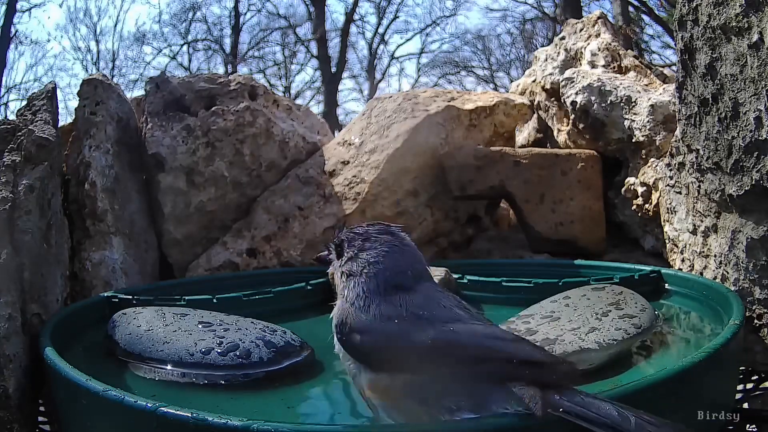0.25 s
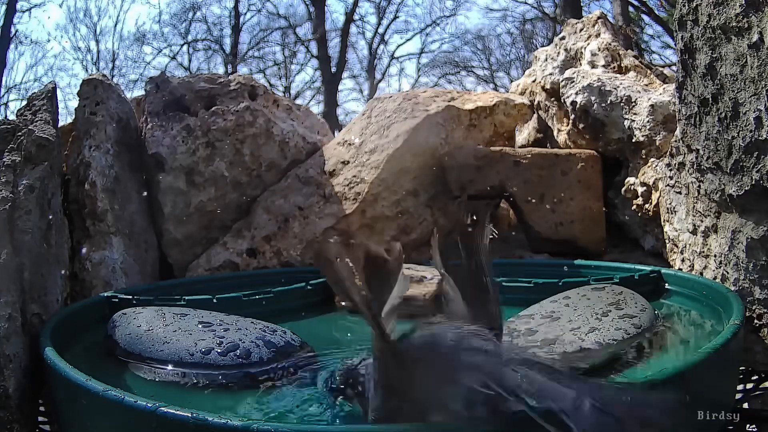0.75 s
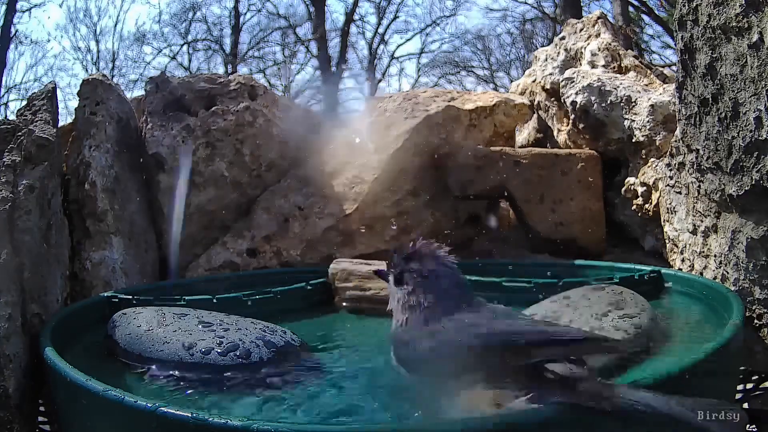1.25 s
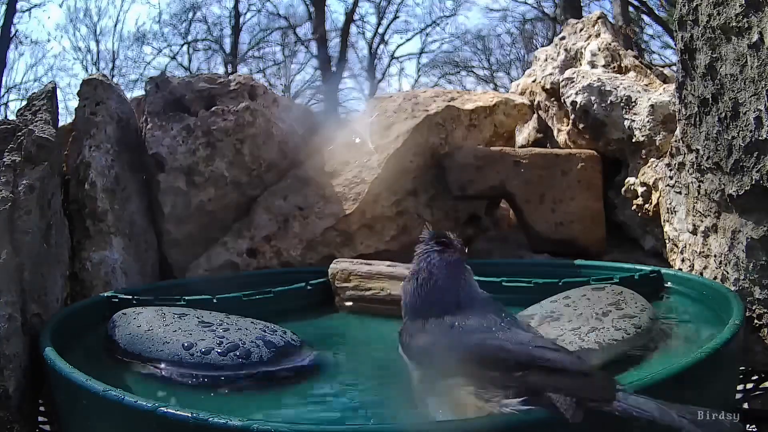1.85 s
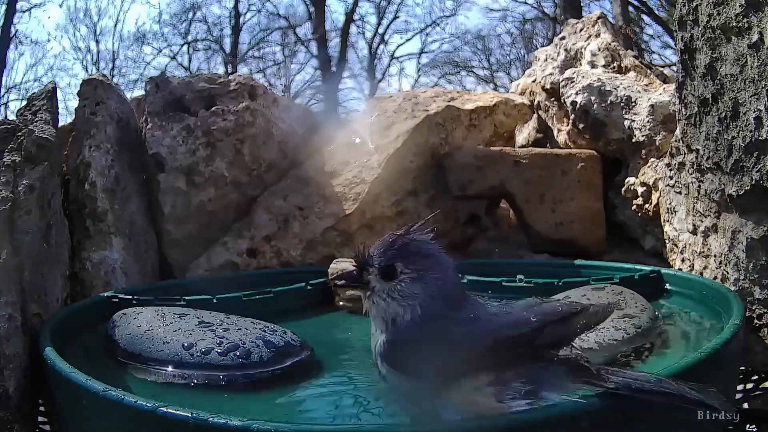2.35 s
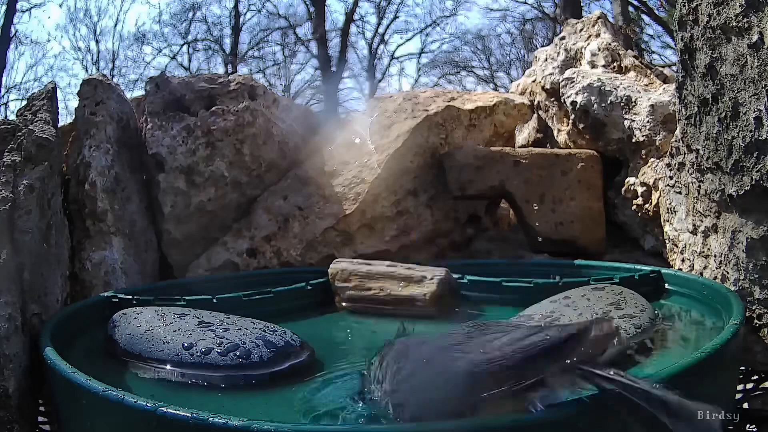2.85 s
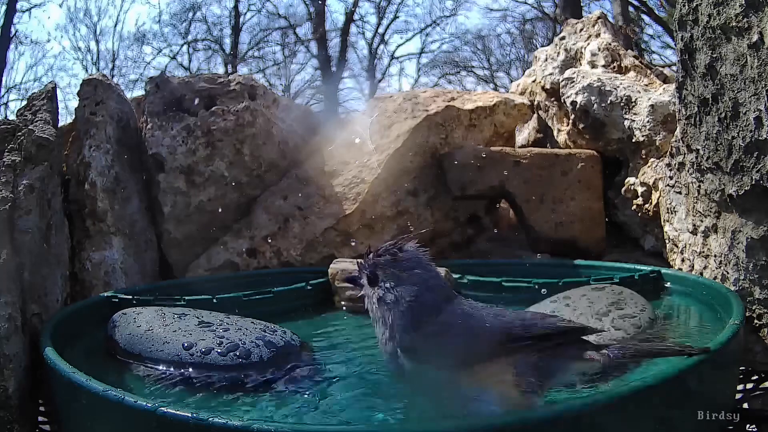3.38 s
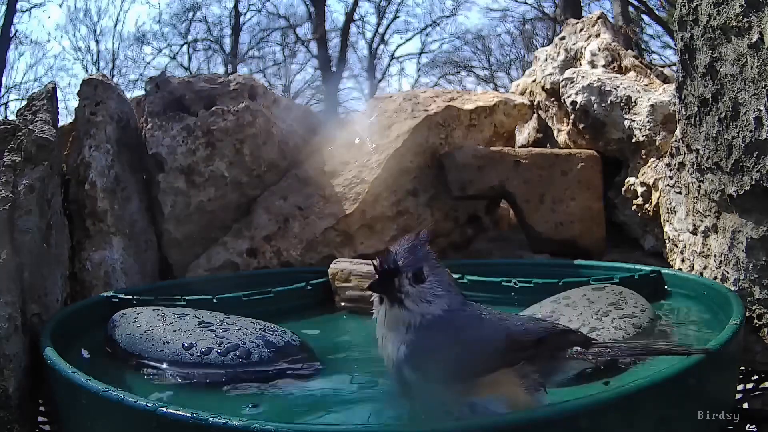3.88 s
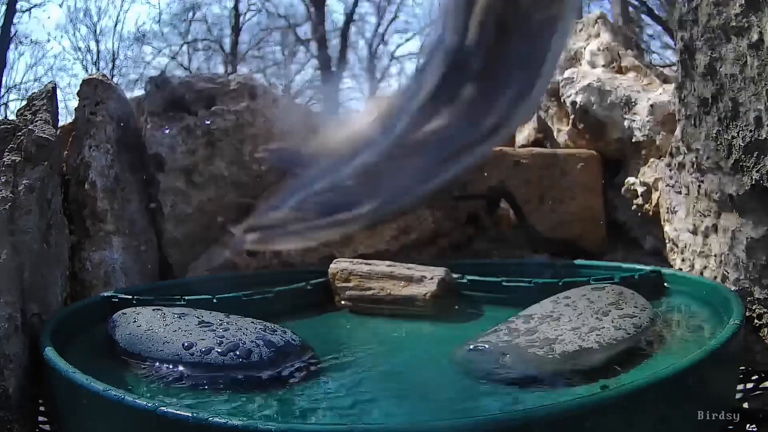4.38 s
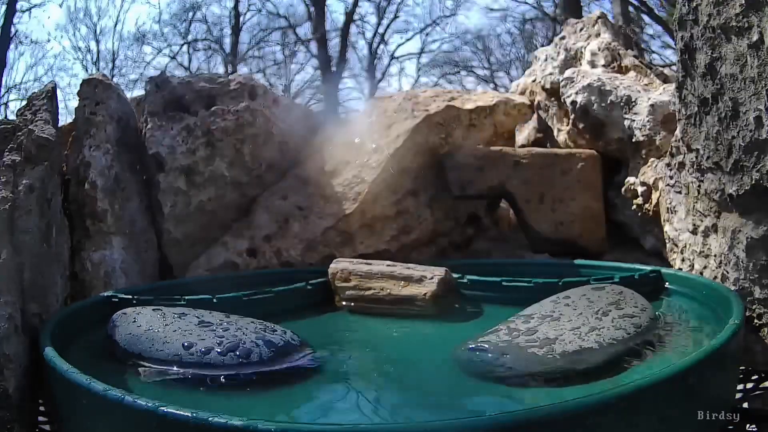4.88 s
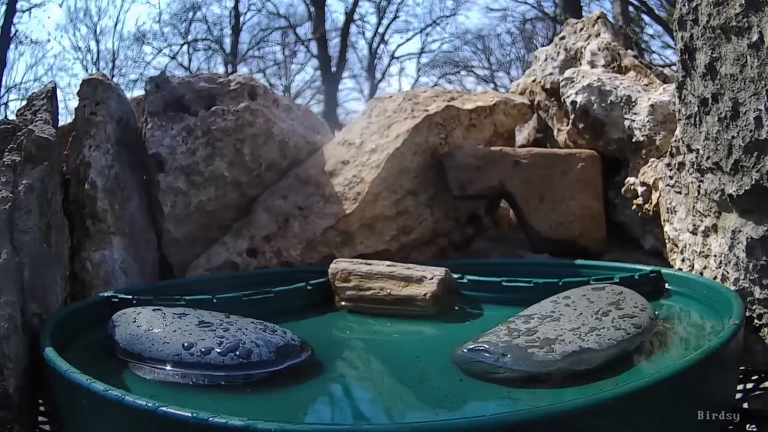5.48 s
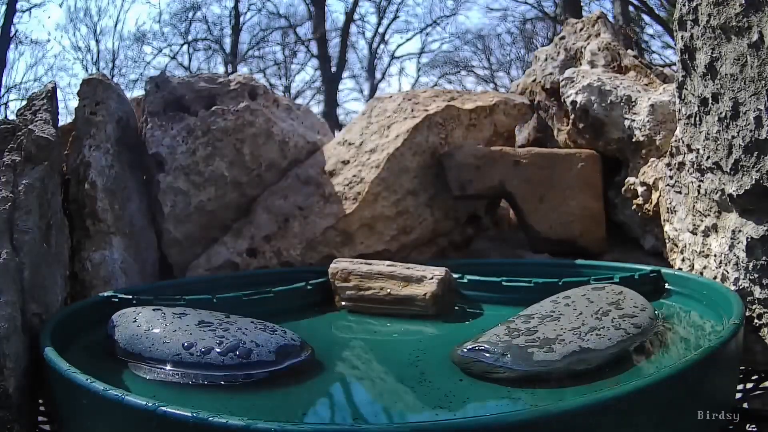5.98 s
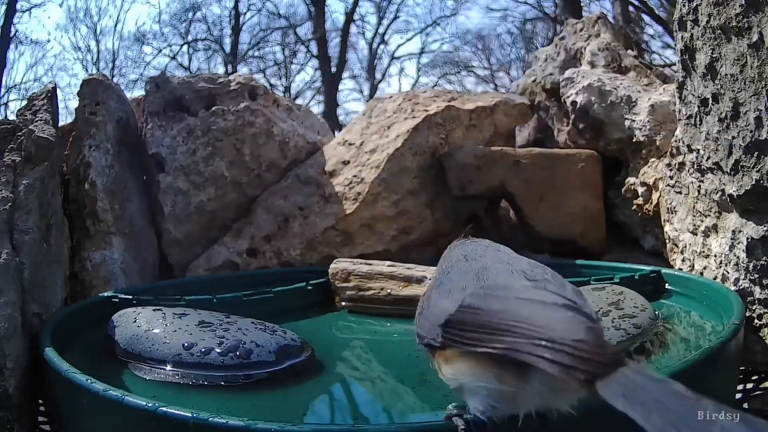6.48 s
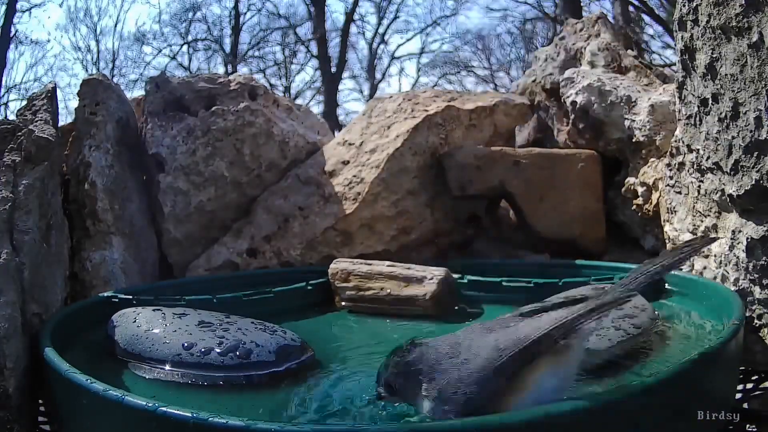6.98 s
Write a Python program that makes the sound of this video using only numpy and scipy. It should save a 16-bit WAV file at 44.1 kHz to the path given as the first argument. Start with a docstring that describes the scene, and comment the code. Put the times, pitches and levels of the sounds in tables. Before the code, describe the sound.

Two short bursts of fluttery splashing, close thudding wingbeats with tiny claw clicks and scrapes, then feet knocking on a plastic rim in a quiet backyard.

```python
"""Far traffic murmurs and birds chirp in the trees of a quiet backyard. Near 1 s a small songbird bathes in a shallow
plastic birdbath: its wings slap up noise bursts and ringing droplets, and again, more briefly, just after 3 s.
Near 4.5 s it flies up onto the camera: wingbeats push air at the microphone, and claws tick and scrape on the
ringing housing. More strong wingbeats follow near 5.4 s and the far tyre noise grows.
Near 6.6 s the bird's feet knock on the rim and it wades in, with one more slap and light spray."""
import sys
import numpy as np
from scipy import signal
from scipy.fft import rfft, irfft, next_fast_len
from scipy.io import wavfile
from scipy.ndimage import uniform_filter1d, map_coordinates

SR = 44100
rng = np.random.default_rng(int(sys.argv[2]) if len(sys.argv) > 2 else 0)


def store_wav(level_fs):
    """Save 16-bit WAV to argv[1]."""
    pcm = np.round(np.clip(np.atleast_2d(level_fs), -1, 1) * 32767)
    wavfile.write(sys.argv[1], SR, pcm.T.astype(np.int16))


N = 318843

# In the tables below, layer gains and random wobbles may be added to the levels,
# and spectrum levels are relative: only their shape matters where the noise is scaled afterwards.


def amp(db):
    """Turn decibels into a gain."""
    return 10 ** (np.asarray(db) / 20)


def unit(x):
    """Scale a sound to an average (rms) strength of 1."""
    return x / np.sqrt(np.mean(x ** 2) + 1e-20)


def shape(points):
    """Make a gain curve over frequency from (f/Hz, level/dB) points, joined on a log frequency axis."""
    f, db = np.transpose(points)
    return lambda hz: amp(np.interp(np.log(hz + 1), np.log(f + 1), db))


def levels(rows, outside_db=None):
    """Make one gain curve over time for each level column that follows the time column."""
    times, *columns = np.transpose(rows)
    now = np.arange(N) / SR
    return [amp(np.interp(now, times, column, outside_db, outside_db)) for column in columns]


def wobble(rate):
    """Draw a smooth random curve through `rate` random points a second."""
    knots = rng.standard_normal(int(N * rate / SR) + 4)
    return map_coordinates(knots, [np.arange(N) * rate / SR])


def colour(x, gain):
    """Filter a sound with a gain curve over frequency, without any sound before the hit (minimum phase)."""
    size = 2 * next_fast_len(len(x) // 2 + 2048)
    wanted = gain(np.fft.rfftfreq(size, 1 / SR))
    cepstrum = irfft(np.log(np.maximum(wanted, 1e-6)))
    # folding the second half onto the first makes the filter respond only after its input
    cepstrum[1:size // 2] *= 2
    cepstrum[size // 2 + 1:] = 0
    return irfft(rfft(x, size) * np.exp(rfft(cepstrum)))[:len(x)]


def noise(points):
    """Make steady noise of rms 1 with the given spectrum."""
    size = next_fast_len(N)
    spectrum = rfft(rng.standard_normal(size)) * shape(points)(np.fft.rfftfreq(size, 1 / SR))
    return unit(irfft(spectrum, size)[:N])


def resonances(modes, hz, width_scale):
    """Gain of a ringing body: a peak at each mode, where a wider peak dies away sooner."""
    return np.sqrt(sum(amp(db) ** 2 / (1 + (2 * (hz - f) / (width * width_scale)) ** 2)
                       for f, width, db in modes))


def crackle(size, rate, spread_db):
    """Scatter single-sample clicks of very uneven strength, about `rate` a second."""
    strength = amp(spread_db * np.minimum(rng.exponential(size=size), 3))
    return (rng.random(size) < rate / SR) * strength * rng.choice([-1, 1], size)


def loudest_to_one(x):
    """Scale a knock so that its loudest millisecond has rms 1."""
    return x / np.sqrt(uniform_filter1d(x ** 2, size=44).max() + 1e-20)


def add(track, s, sound):
    """Mix a sound into the track at time s."""
    part = track[max(round(s * SR), 0):][:len(sound)]
    part += sound[:len(part)]


def swell(t, start, end, fade_s):
    """Gain that rises to 1 at start, holds until end and dies away."""
    distance = np.maximum(np.maximum(start - t, t - end), 0)
    return np.exp(-distance / fade_s)


def voiced(hit, edges, db, bright_db, middle_db, size):
    """Set the level of a hit's first samples in three bands: a harder contact tilts it to the treble."""
    power = 2 * np.abs(rfft(hit[:size], 1024)) ** 2 / (1024 * size)
    hz = np.fft.rfftfreq(1024, 1 / SR)
    targets = [db - bright_db, db + middle_db, db + bright_db]
    correction = []
    for low, high, target in zip(edges, edges[1:], targets):
        present_db = 10 * np.log10(power[(hz >= low) & (hz < high)].sum() + 1e-20)
        correction.append((np.sqrt(low * high), target - present_db))
    return colour(hit, shape(correction))


# levels of the yard's background: (t/s, rumble level/dB, murmur level/dB)
YARD = [(0, -52, -59), (2.5, -52, -60), (4.1, -54, -63), (5.2, -52.5, -62), (6.5, -50, -62),
        (7.23, -52.5, -56)]
# spectra of low rumble, murmur of far roads and faint hiss: (f/Hz, level/dB per Hz)
RUMBLE = [(10, -6), (20, 0.5), (45, 2.5), (70, -1.5), (100, -6), (140, -12), (200, -17.5), (300, -28),
          (450, -28.5), (900, -76)]
MURMUR = [(180, -27), (300, 0.5), (322, -4), (404, -7.5), (512, -8), (579, -6), (764, -3.5), (968, -3),
          (2140, -19), (2880, -25.5), (3500, -25.5), (4550, -47.5), (7700, -120)]
HISS = [(1000, -9), (2500, -4.5), (4000, 1), (7000, 0.5), (14000, -0.5)]


def yard(rumble_db=2, murmur_db=-3, hiss_db=-74):
    """Low rumble and the murmur of far roads waver slowly as shaped noise, over a steady faint hiss."""
    rumble, murmur = levels(YARD)
    low = rumble * amp(rumble_db + 0.62 * wobble(11)) * noise(RUMBLE)
    middle = murmur * amp(murmur_db + 0.17 * wobble(3.44)) * noise(MURMUR)
    return low + middle + amp(hiss_db) * noise(HISS)


def hum(bands):
    """Unsteady low tones of an engine: noise squeezed into narrow bands, scaled to rms 1."""
    def gain(hz):
        return sum(amp(db) / (1 + (2 * (hz - f) / width) ** 2) / np.sqrt(width) for f, width, db in bands)
    return unit(colour(rng.standard_normal(N), gain))


# narrow bands of a far engine: (f/Hz, width/Hz, level/dB)
DRONE = [(78.2, 9.3, 2), (163.6, 13.2, -12), (217.5, 14.7, -7), (337.3, 27, -12), (500, 45, -16.5)]
# how loud the far engine is: (t/s, level/dB)
DRONE_LEVEL = [(0, -65), (1.2, -65.5), (2.1, -56), (4.4, -57.5), (5.8, -69), (7.23, -56)]


def far_engine():
    """A far engine drones in narrow bands, and its level drifts."""
    return levels(DRONE_LEVEL)[0] * hum(DRONE)


# how loud the far tyres are: (t/s, level/dB)
TYRES = [(0, -68.5), (1.5, -87), (5.0, -85.5), (5.7, -66), (6.3, -64), (6.8, -59.5), (7.23, -64.5)]
# spectrum of tyres on the road: (f/Hz, level/dB per Hz)
ROAD = [(400, -13), (900, 0), (1400, 6.5), (2100, -4), (3000, -12), (5000, -20), (9000, -23.5),
        (15000, -28.5)]


def far_tyres():
    """Tyre noise swells far away: broad shaped noise."""
    return levels(TYRES)[0] * noise(ROAD)


# narrow bands of a nearer motor: (f/Hz, width/Hz, level/dB)
MOTOR = [(64.3, 4.1, -3.5), (98.1, 18.5, 8.5), (129, 23, -6), (195, 44, -11), (271, 16, -15.5),
         (389, 9.1, -9.5)]


def nearer_motor(motor_db=8):
    """A nearer motor hums as it passes, swelling together with the tyre noise."""
    return amp(motor_db) * levels(TYRES)[0] * hum(MOTOR)


# the clearest far birds: (t/s, length/s, first f/Hz, last f/Hz, level/dB)
CHIRPS = [(0.061, 0.089, 3700, 4500, -74), (0.268, 0.053, 3370, 2930, -74), (0.713, 0.061, 3600, 2930, -77),
          (1.964, 0.0626, 3580, 3700, -69), (2.299, 0.028, 3610, 3460, -70.5),
          (2.639, 0.026, 3370, 3900, -70), (2.67, 0.2, 2500, 2480, -80), (2.855, 0.096, 3900, 4850, -73),
          (3.007, 0.014, 4860, 3570, -63.5), (3.083, 0.035, 3520, 3630, -69),
          (3.578, 0.31, 2550, 2520, -82), (6.136, 0.054, 7500, 4400, -66.5),
          (6.348, 0.0614, 4750, 5770, -71.5), (6.48, 0.022, 6300, 4670, -66),
          (6.691, 0.074, 4880, 5520, -72), (7.075, 0.044, 5750, 5200, -72)]


def far_birds(echo_db=-2, echo_s=0.19, chorus_db=-86):
    """Thin warbling whistles glide in pitch over a fainter random chorus, smeared by the trees."""
    out = np.zeros(N)
    chorus = []
    for a, b, c, d in rng.random((110, 4)):
        first_hz = 2400 + 1600 * c
        chorus.append((7.1 * a, 0.053 + 0.07 * b, first_hz, first_hz * (0.8 + 0.36 * d), chorus_db))
    warble, flicker = 1 + 0.015 * wobble(160), amp(3 * wobble(90))
    for s, length, first_hz, last_hz, db in CHIRPS + chorus:
        u = np.linspace(0, 1, int(length * SR))  # progress through the chirp
        at = np.minimum(int(s * SR) + np.arange(len(u)), N - 1)
        hz = first_hz * (last_hz / first_hz) ** u * warble[at]
        envelope = flicker[at] * np.sqrt(4 * u * (1 - u))
        add(out, s, amp(db) * envelope * np.sin(2 * np.pi * np.cumsum(hz) / SR))
    t = np.arange(SR // 2) / SR
    trees = rng.standard_normal(len(t)) * amp(-60 * t / echo_s)  # falls 60 dB in echo_s
    echo = signal.fftconvolve(out, trees / np.linalg.norm(trees))[:N]
    return out + amp(echo_db) * echo


# feet and toes meet the rim: (t/s, level/dB)
FEET = [(6.570, -35.5), (6.5724, -58), (6.5752, -44), (6.5794, -35)]
# spectrum of the soft soles' contact: (f/Hz, level/dB)
SOLES = [(100, 12), (2800, -6), (3400, -7.5), (6000, -5), (14000, -2)]
# ringing modes of the plastic rim, widths before scaling: (f/Hz, width/Hz, level/dB)
RIM = [(207, 27, 6.5), (332, 100, 4.5), (800, 200, -8), (1240, 57, 7), (1390, 270, 6), (2110, 170, 7.5),
       (2640, 270, 3), (2880, 100, -3)]


def landing(contact_s=0.0035, knock_db=-1):
    """Feet and toes knock on the rim with short noise bursts; the water damps the plastic quickly."""
    def rim_gain(hz):
        return shape(SOLES)(hz) * resonances(RIM, hz, width_scale=0.54)
    out, t = np.zeros(N), np.arange(SR // 6) / SR
    for s, db in FEET:
        force = rng.standard_normal(len(t)) * np.exp(-t / contact_s)
        add(out, s, amp(db + knock_db) * loudest_to_one(colour(force, rim_gain)))
    return out


# downstrokes push air at the microphone: (t/s, push level/dB)
WINGBEATS = [(4.45, -25), (4.517, -20), (4.577, -25.5), (4.791, -17.5), (4.846, -28), (5.381, -16.5),
             (5.426, -16), (5.467, -18), (5.508, -31.5), (5.546, -23), (5.875, -32.5)]
# bursts of fluttering stir the air: (start t/s, end t/s, eddy level/dB, feather swish level/dB)
FLUTTERS = [(0.94, 1.347, -48.5, -72), (3.2, 3.347, -50.5, -75), (4.435, 4.602, -49, -56),
            (4.76, 4.807, -46.5, -62), (5.361, 5.494, -36.5, -61.5), (5.998, 6.01, -39, -56.5),
            (6.326, 6.363, -51, -60)]
# spectra of downstroke gusts, stirred air and feathers: (f/Hz, level/dB per Hz)
BUFFET = [(40, -22), (100, 1.5), (250, 3), (550, -13), (900, -6), (1500, -21), (3000, -21.5), (5000, -33),
          (12000, -46)]
EDDIES = [(15, -42), (50, 10.5), (110, 6.5), (250, -8.5), (500, -11.5), (900, -23), (2000, -33),
          (6000, -50)]
SWISH = [(600, 1), (2000, -2), (4000, -4), (9000, -11.5), (14000, -14)]


def wings(suction=0.64, stroke_s=0.01, lead_s=0.012, buffet_s=0.0046, buffet_db=-39, buffet_grows=0.49,
          eddy_db=-5, swish_db=-5, eddy_fade_s=0.014, swish_fade_s=0.042):
    """A downstroke pushes air between two dips of suction; its vortex buffets the microphone just ahead of it."""
    out, gusts = np.zeros(N), np.zeros(N)
    t = np.arange(-SR // 10, SR // 10) / SR
    u = t / stroke_s
    # a sharp push minus a wider, weaker suction
    push = (1 + suction) * np.exp(-np.abs(u) ** 1.42)
    push -= suction * np.exp(-(u * suction / (1 + suction)) ** 2)
    gust = np.exp(-((t + lead_s) / buffet_s) ** 2)
    for s, push_db in WINGBEATS:
        add(out, s + t[0], amp(push_db) * push)
        add(gusts, s + t[0], amp(buffet_grows * push_db + buffet_db) * gust)
    now = np.arange(N) / SR
    eddies = sum(amp(db) * swell(now, start, end, eddy_fade_s) for start, end, db, _ in FLUTTERS)
    swish = sum(amp(db) * swell(now, start, end, swish_fade_s) for start, end, _, db in FLUTTERS)
    flutter = unit(amp(3.2 * wobble(70)))
    stirred = amp(eddy_db) * eddies * noise(EDDIES) + amp(swish_db) * swish * noise(SWISH)
    return out + gusts * noise(BUFFET) + flutter * stirred


# ringing modes of the small housing, widths before scaling: (f/Hz, width/Hz, level/dB)
HOUSING = [(4306, 74, -1), (5790, 180, 1.5), (7870, 67, -19), (8400, 160, -8), (9450, 330, -8),
           (10270, 290, -2.5), (11600, 85, -5), (12800, 130, 3.5), (13640, 260, 0.5), (14600, 59, -6)]
# spectrum of a claw on the housing: (f/Hz, level/dB per Hz)
CLAW = [(1470, -59), (2500, -26.5), (3750, -20), (4230, -11), (5020, -14.5), (5330, -5.5), (5830, -3.5),
        (6480, 1), (7250, -14), (8110, -2), (9010, -10.5), (9930, -3), (11500, -12.5), (13700, -8.5),
        (15000, -18)]


def housing(force, treble_db, ring_db=10):
    """The small hard shell rings under the claws; each spot excites its modes in other proportions."""
    modes = [(hz, width, db + rng.normal(0, 3)) for hz, width, db in HOUSING]
    tone = shape([(1500, -31), (2800, -1), (4000, 2.5), (6500, -4.5), (9000, treble_db)])

    def gain(hz):
        return shape(CLAW)(hz) * tone(hz) * (1 + amp(ring_db) * resonances(modes, hz, width_scale=1.1))
    return colour(force, gain)


# claws strike the housing: (t/s, level/dB, brightness/dB, rise/s)
TICKS = [(4.5455, -57.5, -11, .0005), (4.555, -40, -5.5, 0.001), (4.5615, -43.5, 3, 0.00018),
         (4.706, -52, -12.5, .0005), (4.7615, -39, -7, 0.0004), (4.7821, -43.5, -8, 0.00057),
         (4.834, -40, 0, 0.0018), (4.839, -31, -0.5, 0.00045), (4.87, -40, -5, 0.0013),
         (5.0602, -55, -4, 0.00093), (5.0685, -60, -1, .0006), (5.0951, -43, 0.5, 0.00047),
         (5.131, -63, -5, .0003), (5.1385, -58, -4, 0.00036), (5.3348, -38, 7, 0.0015),
         (5.364, -44.5, 6, 0.0015), (5.3898, -53, 1, 0.00034), (5.723, -54, 1, 0.00024),
         (5.7408, -45, -2, 0.00023), (5.7686, -45.5, -2.5, 0.0012), (5.9665, -56.5, 0, 0.00066),
         (6, -58.5, 0, 0.00029)]
# edges of a tick's low, middle and top bands: f/Hz
TICK_BANDS = [3500, 7000, 11500, 15000]


def claw_ticks(skid_s=0.0074, skid_db=-21):
    """Claw tips tick on the housing: each is a quick burst of force with a faint skid after it."""
    out, t = np.zeros(N), np.arange(SR // 20) / SR
    for s, db, bright_db, rise in TICKS:
        u = t / rise
        strike = u * np.exp(1 - u)  # peaks at the rise time
        skid = amp(skid_db) * np.exp(-t / skid_s)
        force = rng.standard_normal(len(t)) * (strike + skid)
        add(out, s, voiced(housing(force, 0), TICK_BANDS, db, bright_db, middle_db=1, size=176))
    return out


# claws slide on the housing: (start t/s, end t/s, level/dB, treble level/dB)
SCRAPES = [(4.591, 4.646, -50.5, -11.5), (4.659, 4.711, -51.5, -15), (4.729, 4.76, -50, -13),
           (4.79, 4.812, -39, -7.5), (4.827, 4.896, -51, -5), (4.969, 5.037, -73, -9),
           (5.058, 5.117, -60.5, -1), (5.293, 5.366, -52, -4), (5.328, 5.354, -46, 5),
           (5.683, 5.74, -69.5, 0), (5.75, 5.788, -59, -7), (5.84, 5.9, -60.5, -6),
           (5.931, 5.942, -55.5, 2)]


def claw_scrapes(edge_s=0.0035, scrape_db=-1, grip_db=3.5):
    """Claw tips slide over the housing in tiny slips, pressing in and easing off."""
    out = np.zeros(N)
    grip = amp(grip_db * wobble(220))
    for start, end, db, treble_db in SCRAPES:
        # leave 25 ms on each side for the fades
        at = np.arange(round(start * SR) - SR // 40, round(end * SR) + SR // 40)
        slips = crackle(len(at), rate=2900, spread_db=3.5) * grip[at]
        scrape = swell(at / SR, start, end, edge_s) * unit(housing(slips, treble_db))
        add(out, at[0] / SR, amp(db + scrape_db) * scrape)
    return out


# the largest bubbles: (t/s, starting f/Hz, level/dB)
BUBBLES = [(1.073, 2950, -41), (1.259, 2130, -39), (1.321, 1860, -39.5), (1.329, 1350, -45),
           (1.360, 2900, -42), (1.392, 3800, -43), (1.407, 3670, -38), (3.076, 1355, -43),
           (3.278, 3250, -36), (3.283, 1364, -38.5), (3.330, 2090, -46), (3.520, 3460, -40),
           (4.375, 2090, -50), (6.305, 1850, -47)]


def bubbles(rise=0.15, onset_s=0.0018, cycles=49):
    """Trapped air rings and climbs in pitch as it nears the surface; small bubbles die sooner."""
    out, t = np.zeros(N), np.arange(SR // 12) / SR
    for s, hz, db in BUBBLES:
        t60 = cycles / hz  # time to fall by 60 dB
        phase = 2 * np.pi * np.cumsum(hz * (1 + rise * t / t60)) / SR
        add(out, s, amp(db - 60 * t / t60) * (1 - np.exp(-t / onset_s)) * np.sin(phase))
    return out


def droplets(times, sizes, centre_hz, scatter, cycles):
    """Every droplet rings for a few cycles at a pitch of its own, rising slightly."""
    draws = rng.standard_normal((len(times), 3))  # pitch, life and strength
    hz = np.clip(centre_hz * np.exp(scatter * draws[:, :1]), 700, 14000)
    turns = hz * np.arange(SR // 80) / SR
    life = cycles * np.exp(0.3 * draws[:, 1:2])
    strength = sizes[:, None] * amp(4 * draws[:, 2:])
    rings = strength * np.exp(-turns / life) * np.sin(2 * np.pi * turns * (1 + 0.015 * turns / life))
    at = (times[:, None] * SR).astype(int) + np.arange(SR // 80)
    return np.bincount(at.ravel(), rings.ravel(), N)[:N]


# spectrum of splashing water: (f/Hz, level/dB per Hz)
WATER = [(180, -24), (300, -2), (606, -9), (1400, -9.5), (1620, -12), (1910, -4), (2400, -14), (2690, -6.5),
         (4120, -11.5), (5350, -9.5), (5800, -12), (13600, -15.5), (15000, -36)]
# ringing modes of the plastic basin, widths before scaling: (f/Hz, width/Hz, level/dB)
BASIN = [(1351, 180, -13), (1947, 140, -9.5), (2620, 160, -14), (3610, 190, -7), (4490, 48, -7),
         (5320, 57, -2)]


def wet(hz, basin_db=8):
    """Gain of splashing water, coloured by the ringing of the basin."""
    return shape(WATER)(hz) * (1 + amp(basin_db) * resonances(BASIN, hz, width_scale=0.41))


# flying spray, one list per bout: (t/s, level/dB)
SPRAY = [
    [(0.92, -80), (1.006, -71), (1.206, -64.5), (1.296, -72.5), (1.424, -63), (1.5, -80)],
    [(3.1, -76), (3.186, -68.5), (3.316, -71.5), (3.392, -68), (3.52, -71.5), (3.58, -79)],
    [(4.34, -76), (4.38, -73), (4.44, -74)],
    [(6.66, -79), (6.902, -75), (7.2, -77.5)],
]
# spectrum of fine spray: (f/Hz, level/dB per Hz)
FIZZ = [(200, 14), (500, -2), (2000, -0.5), (4000, -9.5), (8000, -3.5), (14000, -7.5)]


def spray(fizz_db=2, drop_db=1, blip_db=8):
    """Falling droplets ring over crackling fine spray while the water sloshes and bubbles on."""
    level = sum(levels(bout, outside_db=-120)[0] for bout in SPRAY)
    falls = rng.integers(N, size=4000)
    out = droplets(falls / SR, amp(drop_db) * level[falls], centre_hz=3400, scatter=0.6, cycles=6)
    blips = rng.integers(N, size=340)  # fewer, louder and longer rings
    out += droplets(blips / SR, amp(blip_db) * level[blips], centre_hz=3600, scatter=0.4, cycles=8)
    fine = crackle(N, rate=2500, spread_db=5) * amp(4.3 * wobble(110))
    fizz = unit(colour(fine, shape(FIZZ)))
    coarse = crackle(N, rate=500, spread_db=5) * amp(6 * wobble(120))
    slosh = unit(colour(coarse, wet))
    return out + (amp(fizz_db) * fizz + slosh) * level


# wings and body slap the water: (t/s, level/dB, brightness/dB, rise/s)
SLAPS = [(0.959, -57.5, -4, 0.00079), (1.007, -54.5, -0.5, .0027), (1.022, -58.5, 0, .0005),
         (1.078, -54, -5.5, 0.00054), (1.0854, -61, -5, .001), (1.134, -64, -6, 0.0016),
         (1.1489, -54.5, -5, 0.00087), (1.1667, -61, -1.5, .0014), (1.227, -58, -4, 0.0014),
         (1.2567, -47, -2.5, 0.00022), (1.2645, -59, -2, .001), (1.283, -64, 3, .0023),
         (1.3126, -63, -4, 0.002), (1.3196, -62, 5, 0.00083), (1.4443, -62.5, -1, 0.0024),
         (1.9906, -65.5, 2, 0.00055), (2.004, -66.5, 9, 0.0021), (3.0673, -65, -12, 0.0018),
         (3.2152, -60.5, -2.5, 0.0025), (3.243, -57, 4.5, 0.0022), (3.2489, -55, -4, 0.0011),
         (3.2767, -52, -6.5, 0.0014), (3.2809, -56.5, -7, .0025), (3.2953, -57.5, -8, 0.00091),
         (3.363, -62.5, -3, 0.0039), (3.4202, -60.5, 0.5, 0.0013), (3.5175, -62.5, -1.5, 0.0042),
         (4.376, -63, -0.5, 0.0042), (6.3041, -61, -2.5, 0.0034), (6.3493, -63, -2, 0.0017),
         (6.872, -58, 4, 0.0033)]
# edges of a slap's body, splash and fizz bands: f/Hz
SLAP_BANDS = [400, 1600, 5000, 15000]


def slaps(patter_s=0.0056, patter_db=-12, ring_db=-5):
    """Each slap swells, breaks into patter coloured by the basin, and throws six ringing droplets."""
    out, t = np.zeros(N), np.arange(SR // 12) / SR
    for s, db, bright_db, rise in SLAPS:
        u = t / rise
        burst = rng.standard_normal(len(t)) * u * np.exp(1 - u)  # peaks at the rise time
        patter = unit(crackle(len(t), rate=7300, spread_db=6)) * np.exp(-t / patter_s)
        patter *= (1 - np.exp(-u)) * amp(patter_db)
        splash = colour(burst + patter, wet)
        add(out, s, voiced(splash, SLAP_BANDS, db, bright_db, middle_db=0, size=265))
    starts, dbs, _, _ = np.repeat(np.array(SLAPS), 6, axis=0).T
    times = starts + rng.exponential(0.0095, len(starts))  # 9.5 ms after the slap on average
    return out + droplets(times, amp(dbs + ring_db), centre_hz=2370, scatter=0.563, cycles=2.4)


def scene():
    """Add all layers, from the background to the bathing bird, into one channel."""
    background = yard() + far_engine() + far_tyres() + nearer_motor() + far_birds()
    visit = landing() + wings() + claw_ticks() + claw_scrapes()
    bath = bubbles() + spray() + slaps()
    return (background + visit + bath)[None]


def record(dry):
    """The camera keeps almost nothing above its band limit: a very steep low-pass at 14750 Hz."""
    hz = np.fft.rfftfreq(N, 1 / SR)
    return irfft(rfft(dry) / np.sqrt(1 + (hz / 14750) ** 140), N)


dry = scene()
out = record(dry)
store_wav(out)
```